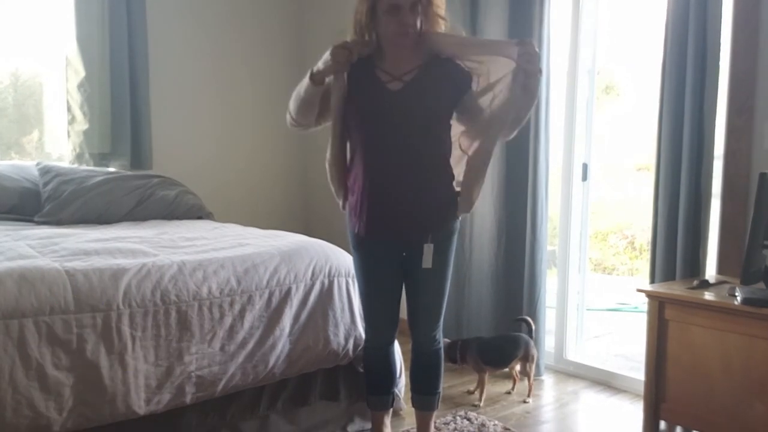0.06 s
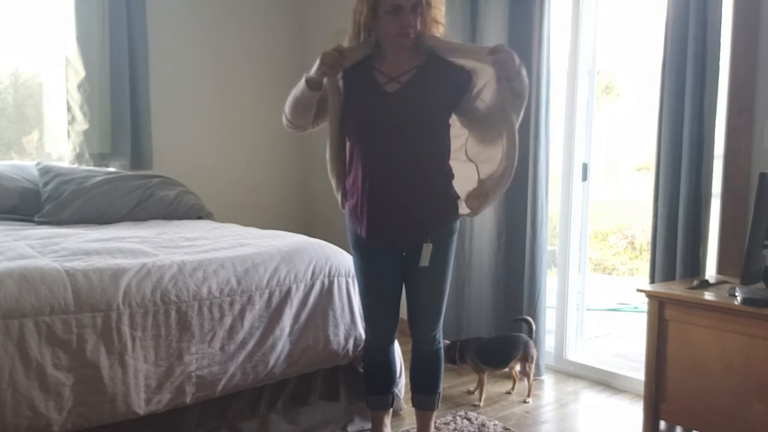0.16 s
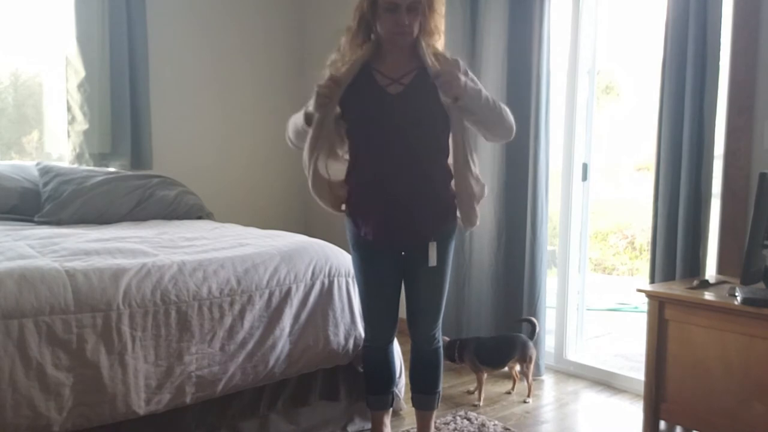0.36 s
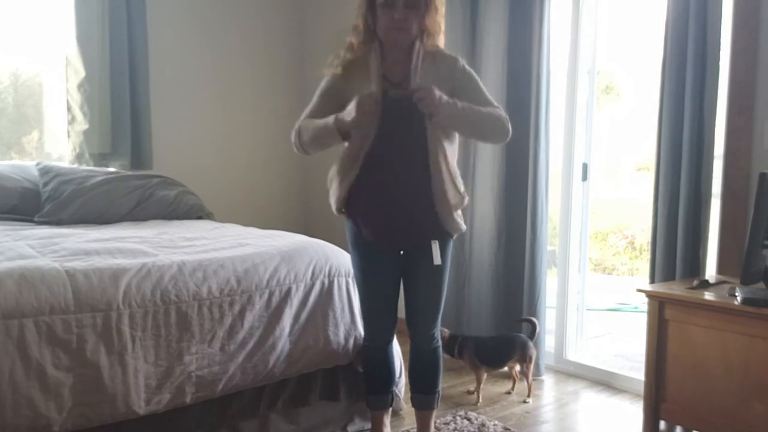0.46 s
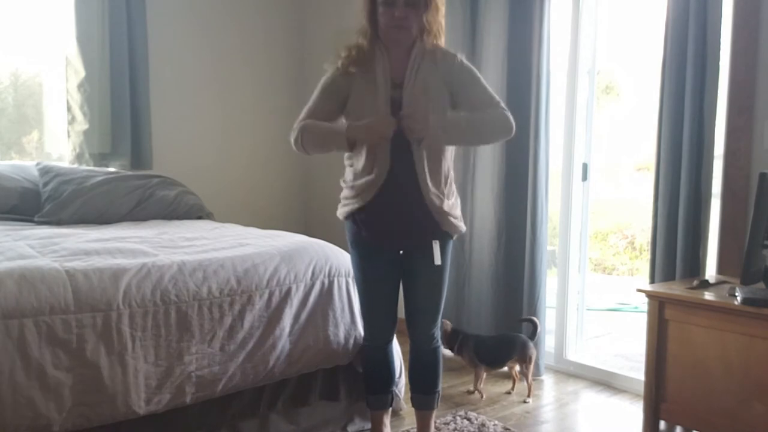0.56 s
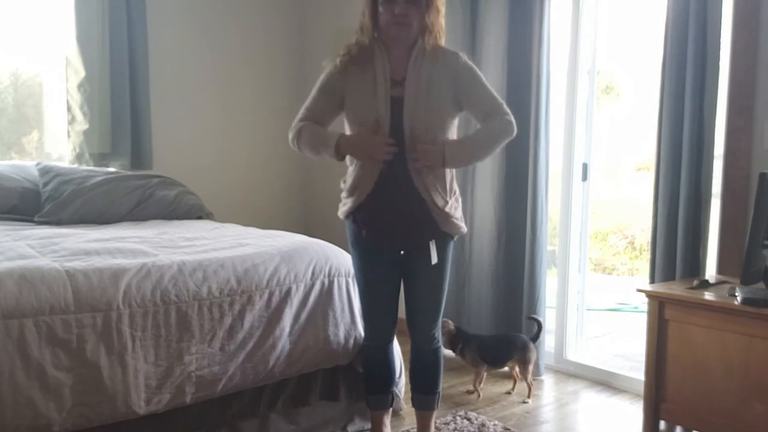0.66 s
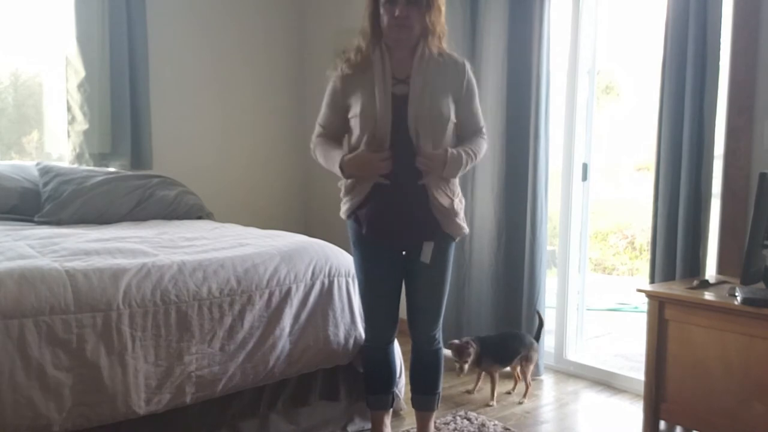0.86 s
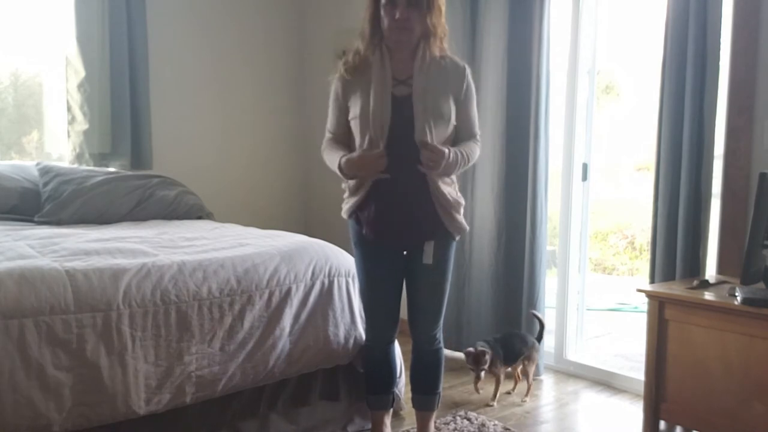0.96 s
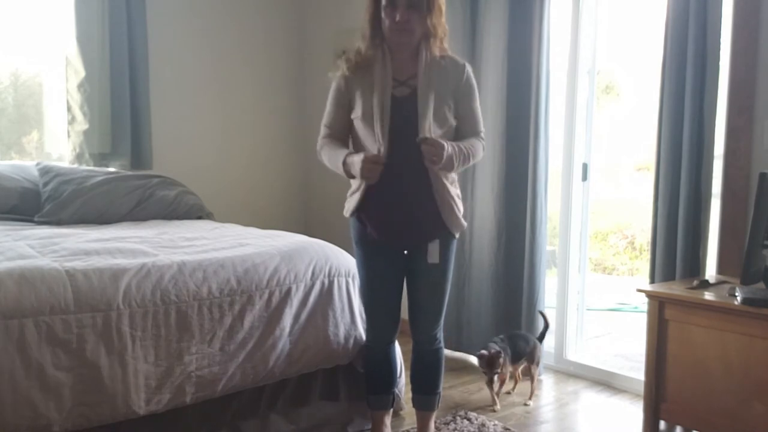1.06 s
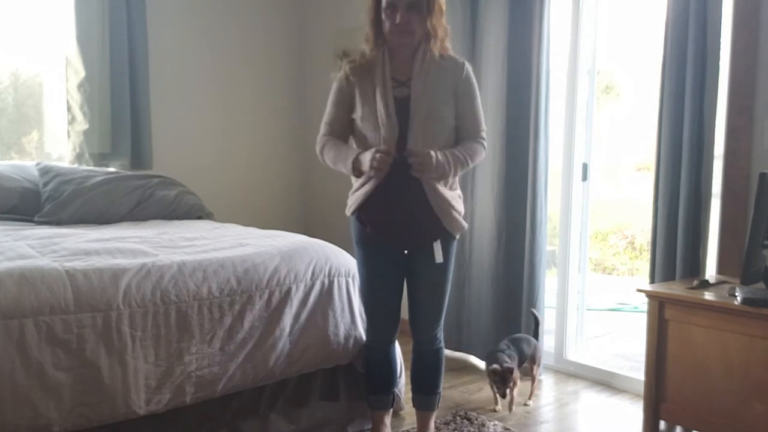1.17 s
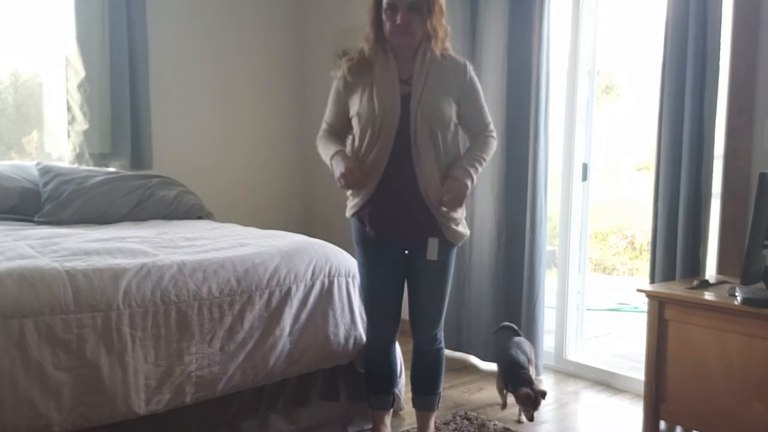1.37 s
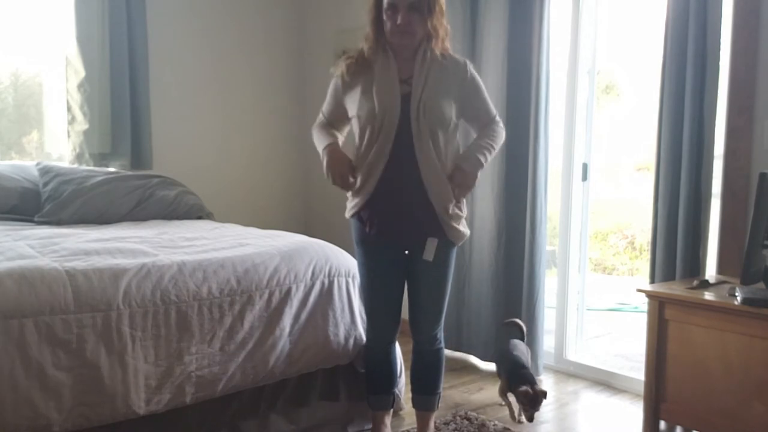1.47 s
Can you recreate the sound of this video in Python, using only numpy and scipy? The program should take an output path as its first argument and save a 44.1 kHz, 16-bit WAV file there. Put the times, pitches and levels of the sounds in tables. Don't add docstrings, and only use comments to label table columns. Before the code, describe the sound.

Dog paws tap and scuff across hard wooden boards indoors, claws ticking in a quiet room

```python
import sys
import numpy as np
from scipy import signal
from scipy.fft import rfft, irfft
from scipy.io import wavfile
from scipy.ndimage import uniform_filter1d

SR = 44100
rng = np.random.default_rng(int(sys.argv[2]) if len(sys.argv) > 2 else 0)


def volts(x):
    e = np.asarray(x, float) / 20
    return 10 ** e


def dump_mix(stems):
    frames = np.atleast_2d(stems).T
    limited = np.clip(frames, -1, 1)
    pcm = np.round(limited * 32767).astype(np.int16)
    wavfile.write(sys.argv[1], SR, pcm)


N = 66150


def evened(x):
    return x / np.sqrt(np.mean(x ** 2) + 1e-20)


def peak(x, db):
    return volts(db) * x / abs(x).max()


def read(points, hz):
    point_hz, value = np.transpose(points)
    return np.interp(np.log(hz + 1), np.log(point_hz + 1), value)


def colour(x, points):
    length = x.shape[-1]
    hz = np.fft.rfftfreq(length, 1 / SR)
    return irfft(rfft(x) * volts(read(points, hz)), length)


def add(mix, start_s, sound):
    start = max(round(start_s * SR), 0)
    part = mix[start:][:len(sound)]
    part += sound[:len(part)]


def resonate(x, hz, width_hz):
    turn = np.exp(2j * np.pi * hz * np.arange(len(x)) / SR)
    r = np.exp(-np.pi * width_hz / SR)
    return 2 * (turn * signal.lfilter([1 - r], [1, -r], x / turn)).real


def burst(noise, fade_s):
    t = np.arange(len(noise)) / SR
    return noise * (1 - np.exp(-t / .003)) * np.exp(-t / max(fade_s, .002))


def ring_modes(table):
    out = np.zeros(N)
    t = np.arange(SR // 2) / SR
    rise_per_cycle = 2.2
    for start_s, db, hz, t60_s in table:
        rise = (1 - np.exp(-t * hz * rise_per_cycle)) ** 2
        mode = rise * volts(-60 * t / t60_s) * np.sin(2 * np.pi * hz * t)
        add(out, start_s, peak(mode, db))
    return out


def air():
    # freq_hz, density_db
    air_tone = [(18, -58), (36, 25), (81, -13), (161, -8.5), (649, -15.5), (1860, -14.5), (4080, -8.5),
                (7670, -9.5), (16000, -22.5)]
    return volts(-53) * evened(colour(rng.standard_normal((2, N)), air_tone))


def room(x):
    # freq_hz, t60_s
    decay = [(100, 0.43), (500, 0.36), (1500, 0.46), (3000, 0.44), (6000, 0.35), (12000, 0.25)]
    taps = np.zeros((2, SR))
    at = np.arange(300, SR - 20, 20) + rng.integers(0, 20, (2, (SR - 301) // 20))
    np.put_along_axis(taps, at, rng.choice([-1., 1.], at.shape), 1)
    hz, t, bands = signal.stft(taps, SR, nperseg=256)
    bands = bands * volts(-60 * t / read(decay, hz)[:, None])
    tail = signal.istft(bands, SR, nperseg=256)[1]
    return signal.fftconvolve(x[None], tail / np.linalg.norm(tail[0]), axes=1)[:, :N]


def direct(x):
    # freq_hz, level_db
    shade = [(300, -6), (1500, -5.5), (5000, -17), (14000, -11)]
    # delay_s, level_db
    echoes = [
        (.0031, -19),
        (.0047, -19),
        (.0068, -21),
        (.0083, -21),
    ]
    lag = 17
    out = np.array([x, np.roll(colour(x, shade), lag)])
    for k, (delay_s, db) in enumerate(echoes):
        add(out[k % 2], delay_s, volts(db) * x)
    return out


def thumps():
    # start_s, peak_db, pitch_hz, t60_s
    thump_modes = [(0, -78.5, 59.3, 0.12), (0.094, -44, 69, 0.17), (0.116, -35.5, 77, 0.081),
                   (.14, -39, 71.6, 0.064), (0.194, -44.5, 69, 0.095), (.232, -40, 69, 0.09),
                   (0.247, -29, 66, 0.025), (0.297, -35, 60.5, 0.033), (.35, -49, 69, 0.13),
                   (.522, -41, 55, 0.058), (.48, -42.5, 81.4, 0.21), (.49, -51, 134, 0.11),
                   (.546, -25, 73, 0.093), (.558, -25.5, 100, 0.065), (.577, -31.5, 132, 0.087),
                   (0.614, -35, 66, 0.086), (.655, -33.5, 65, 0.067), (0.689, -40, 46.7, 0.075),
                   (0.726, -30.5, 41, 0.047), (0.789, -41, 46.4, 0.053), (.885, -38, 60, 0.062),
                   (0.901, -37, 60.3, 0.024), (0.925, -42, 121, 0.061), (0.949, -41, 65, 0.088),
                   (1.011, -59, 67.6, 0.11), (1.119, -57.5, 104, 0.14), (1.205, -48, 54.7, 0.21),
                   (1.25, -46.5, 60, 0.087), (1.373, -74, 58, 0.17), (1.486, -46, 54.7, 0.062)]
    return ring_modes(thump_modes)


def knocks():
    # start_s, peak_db, pitch_hz, t60_s
    knock_modes = [(.5445, -35, 340, .05), (.546, -38, 440, .04), (.547, -39, 560, .04),
                   (.554, -31, 200, .08), (.575, -38, 330, .06), (.600, -40, 370, .08),
                   (.641, -42, 355, .1), (.615, -46, 650, .08), (.69, -50, 400, .08), (.228, -54, 340, .08),
                   (.245, -56, 260, .08), (.298, -54, 200, .08), (.38, -54, 630, .05),
                   (.395, -58, 360, .08), (.483, -58, 245, .08), (.105, -56, 240, .1), (.165, -60, 210, .1),
                   (.879, -52, 360, .06), (.895, -48, 150, .1), (.90, -53, 240, .06), (.905, -54, 600, .06),
                   (.96, -52, 150, .1), (1.147, -57, 800, .05), (1.205, -61, 520, .05),
                   (1.235, -59, 620, .05), (1.27, -62, 480, .05), (1.28, -56, 140, .1)]
    return ring_modes(knock_modes)


def rattles():
    # start_s, peak_db, pitch_hz, fade_s
    buzzes = [(.238, -33, 1750, .03), (.377, -40, 1150, .01), (.38, -45, 1840, .01), (.57, -35, 300, .044),
              (.98, -41, 1920, .006), (.563, -30, 1000, .02), (.898, -43, 1050, .006),
              (.877, -43, 1020, .008), (.57, -32, 1350, .03), (1.205, -44, 2100, .03),
              (1.12, -47, 1130, .05), (1.332, -42, 1150, .014), (1.36, -41, 980, .01),
              (1.382, -45, 880, .015)]
    width_hz = 350
    out = np.zeros(N)
    for start_s, db, hz, fade_s in buzzes:
        blows = burst(rng.standard_normal(9000), fade_s)
        buzz = resonate(resonate(blows, hz, width_hz), hz, 2 * width_hz)
        add(out, start_s, peak(buzz, db))
    return out


def scuffs():
    # start_s, length_s, level_db, body_db
    drags = [(0, 0.018, -57, -4.5), (0.143, 0.02, -60.5, 8), (0.216, .11, -42, -15),
             (0.556, 0.064, -47.5, -18), (0.613, 0.072, -60.5, 20), (0.643, 0.089, -39.5, -17),
             (0.765, 0.053, -49, -26), (0.819, 0.11, -41.5, -27), (0.956, 0.04, -45, -9.5),
             (1.095, 0.085, -38.5, -23.5), (1.186, 0.054, -47, -2), (1.286, 0.023, -39.5, -41),
             (1.387, 0.066, -53.5, -12.5)]
    # freq_hz, density_db
    hiss_tone = [(180, -71), (300, -36), (814, -11), (1060, -6.5), (1170, -5), (2030, -6), (2570, 5.5),
                 (11500, 3), (16000, -3)]
    body_hz, body_width_hz = 3150, 2220
    t = np.arange(N) / SR
    grain = evened(uniform_filter1d(rng.standard_normal(N), size=60))
    grit = rng.standard_normal(N) * volts(1.2 * grain)
    hiss = evened(colour(grit, hiss_tone))
    body = evened(resonate(resonate(grit, body_hz, body_width_hz), body_hz, 2 * body_width_hz))
    out = np.zeros(N)
    for start_s, length_s, db, body_db in drags:
        progress = np.clip((t - start_s) / length_s, 0, 1)
        swell = np.sin(np.pi * progress ** .75) ** 0.9
        out += volts(db) * swell * (hiss + volts(body_db) * body)
    return out


def clatters():
    # start_s, peak_db, ring_hz, fade_s
    landings = [(.2330, -28, 3300, .004), (.2380, -25, 2900, .008), (.9025, -26, 2600, .005),
                (.884, -31, 2700, .005), (1.2030, -33, 2850, .006), (1.226, -33, 3000, .008),
                (1.2320, -29, 3150, .007), (.222, -34, 3000, .01), (.272, -32, 2900, .03),
                (.373, -36, 4500, .006), (.539, -42, 2900, .012), (.5608, -16, 2500, .012),
                (.5612, -16, 3700, .012), (.59, -25, 3100, .035), (.975, -36, 2800, .02),
                (1.257, -36, 2800, .01)]
    # freq_hz, level_db
    claw_band = [(900, -22), (1700, 0), (6000, 0), (12000, -8)]
    width_hz = 860
    out = np.zeros(N)
    for start_s, db, hz, fade_s in landings:
        blows = burst(rng.standard_normal(9000), fade_s)
        lower = resonate(blows, hz, width_hz)
        upper = resonate(blows, 1.4 * hz, width_hz)
        paw = resonate(lower + volts(-13) * upper, 0.95 * hz, 3200)
        add(out, start_s, peak(colour(paw, claw_band), db))
    return out


def chirps():
    # start_s, peak_db, pitch_hz, t60_s
    clear_modes = [(.2245, -37, 3000, .02), (.2285, -37, 3200, .02), (.2340, -29, 4300, .01),
                   (.2405, -27, 3100, .012), (.2420, -37, 8000, .008), (.2428, -23, 2900, .018),
                   (.2555, -30, 2800, .01), (.3850, -33, 2700, .012), (.3862, -34, 3900, .01),
                   (.5372, -31, 3600, .008), (.5378, -31, 5300, .008), (.5630, -22, 3800, .01),
                   (.5655, -18, 2900, .01), (.5680, -28, 5800, .008), (.5690, -23, 2300, .012),
                   (.8805, -30, 4300, .008), (.8822, -27, 3500, .01), (.8848, -31, 3000, .012),
                   (.8872, -30, 2700, .012), (.9000, -24, 2900, .012), (.9045, -24, 2700, .014),
                   (.9075, -29, 2500, .01), (1.2035, -31, 2900, .02), (1.2065, -36, 4000, .01),
                   (1.2075, -31, 2850, .018), (1.2302, -35, 3200, .012), (1.2332, -27, 3100, .018),
                   (1.2338, -34, 4500, .01), (1.2365, -27, 3250, .018), (1.2372, -33, 5000, .01),
                   (1.2410, -31, 2900, .012), (1.2455, -33, 2900, .012), (1.2575, -35, 2700, .014),
                   (1.338, -43, 1150, .04), (1.366, -41, 1020, .035)]
    return ring_modes(clear_modes)


def ticks():
    # start_s, peak_db, ring_hz, brightness_db
    strikes = [(.2352, -26, 4000, 0), (.3783, -24, 4300, 1), (.3812, -19, 5800, -3), (.8787, -21, 3200, -1),
               (.8818, -20, 3400, 1), (.8985, -20, 4900, -7), (.8995, -16, 2700, -9),
               (.5655, -21, 2900, -26), (1.2350, -35, 6500, -6), (.1448, -27, 4300, -5),
               (.1512, -31, 7000, -3), (.5375, -28, 4600, -16), (1.2862, -36, 10000, -2),
               (.2128, -40, 7500, -12), (.2425, -34, 8000, -8), (.3865, -32, 4000, -6),
               (.6655, -34, 4500, -6), (.9187, -30, 2600, -12), (.9800, -40, 3200, -6),
               (1.2950, -33, 6000, -4), (1.308, -34, 5000, -4), (.3818, -18, 7400, -8),
               (.3816, -22, 15000, -8), (.3785, -29, 13500, -4), (.8820, -20, 11500, -8),
               (.8996, -26, 7500, -6), (.2355, -28, 8500, -2)]
    # freq_hz, level_db
    tip_band = [(900, -22), (1700, 0)]
    snap_s, ring_s, scratch_s = .0002, .00022, .001
    skid_s = .004
    out = np.zeros(N)
    t = np.arange(900) / SR
    for start_s, db, hz, bright_db in strikes:
        noise = rng.standard_normal(len(t))
        ring = t * np.exp(-t / ring_s) * np.sin(2 * np.pi * hz * t)
        snap = np.diff(noise * t * np.exp(-t / snap_s), prepend=0)
        skid = noise[::-1] * np.exp(-abs(t - skid_s) / scratch_s)
        scratch = resonate(resonate(skid, hz, 3800), hz, 7300)
        add(out, start_s, peak(ring, db) + peak(snap, db + bright_db))
        add(out, start_s - skid_s, peak(scratch, db - 8))
    return colour(out, tip_band)


def scene():
    thump, knock, loose = thumps(), knocks(), rattles()
    drag, paws, tips = scuffs(), clatters(), ticks() + chirps()
    send = volts(-10) * tips + volts(-5) * paws + volts(-8.5) * loose
    send += volts(0.5) * drag + volts(-6.5) * knock + volts(-8) * thump
    lean = volts([[0.8], [-0.8]])
    near = direct(tips + paws + loose + drag)
    return near + knock + thump + lean * (room(send) + air())


def band_limit(x):
    return signal.sosfilt(signal.butter(12, 16590, fs=SR, output="sos"), x)


def record(dry):
    # freq_hz, level_db
    mic = [(15, -40), (32, -16), (48, 0), (15800, 0), (15980, -22), (16600, -40)]
    ratio = (np.fft.rfftfreq(N, 1 / SR) / 645) ** 2
    narrowing = np.sqrt(0.28 + ratio) / np.sqrt(1 + ratio)
    mid = dry.mean(0)
    side = irfft(rfft(dry[0] - dry[1]) / 2 * narrowing, N)
    return band_limit(colour(np.array([mid + side, mid - side]), mic))


dry = scene()
out = record(dry)
dump_mix(out)
```